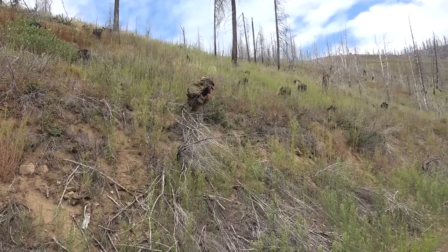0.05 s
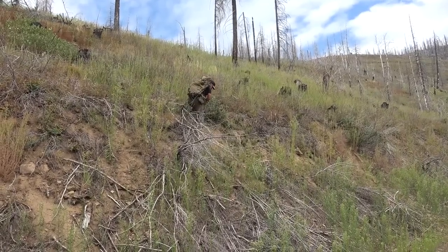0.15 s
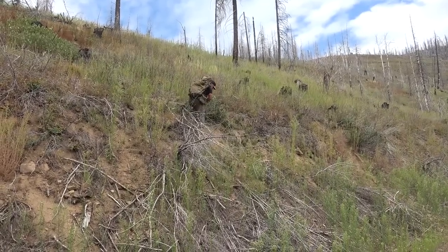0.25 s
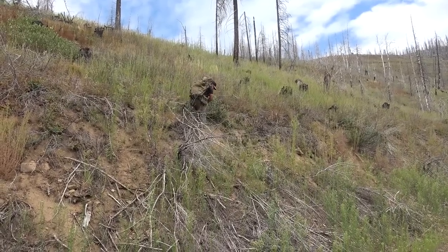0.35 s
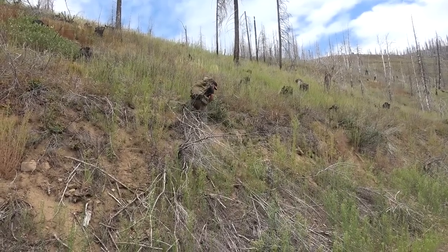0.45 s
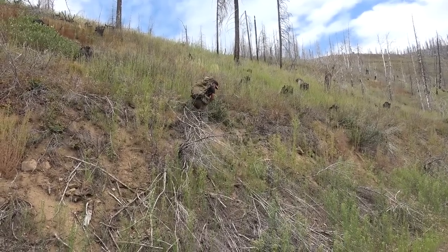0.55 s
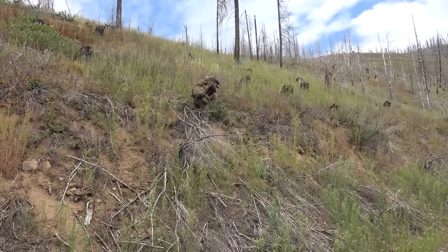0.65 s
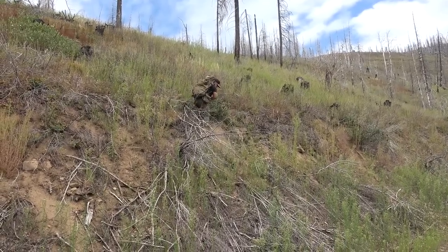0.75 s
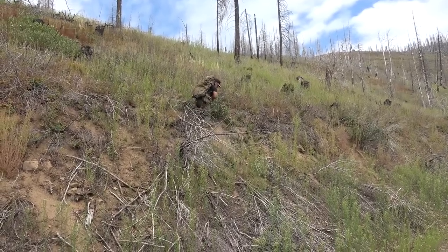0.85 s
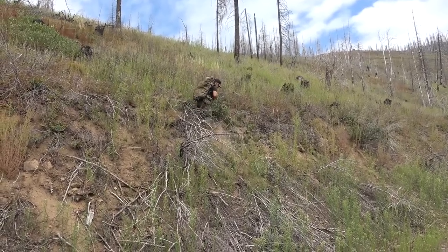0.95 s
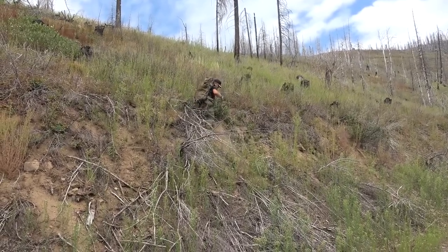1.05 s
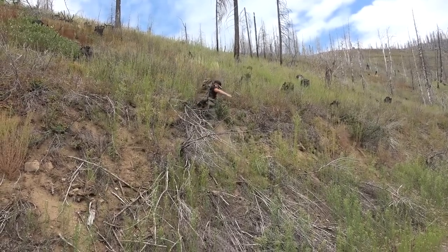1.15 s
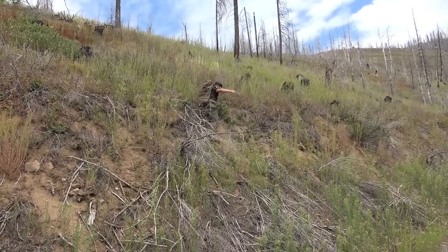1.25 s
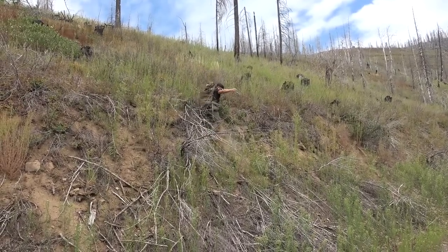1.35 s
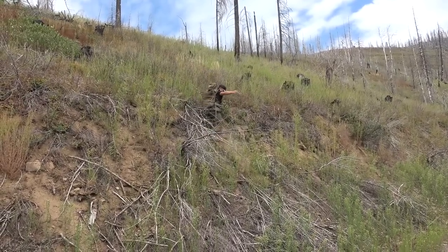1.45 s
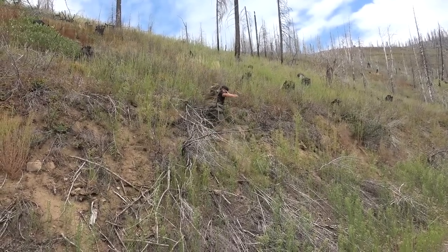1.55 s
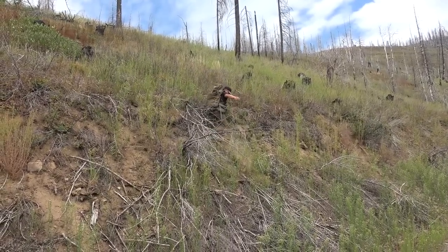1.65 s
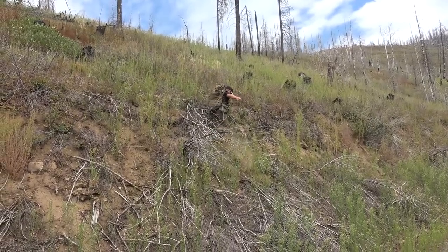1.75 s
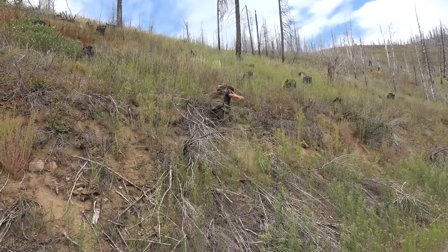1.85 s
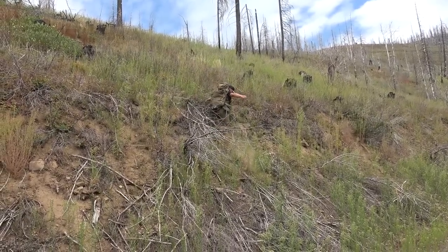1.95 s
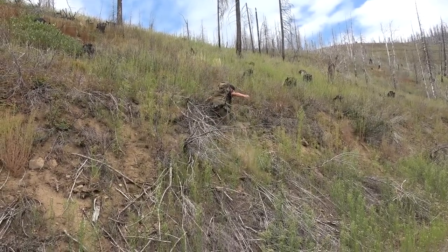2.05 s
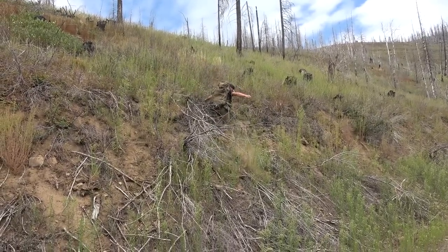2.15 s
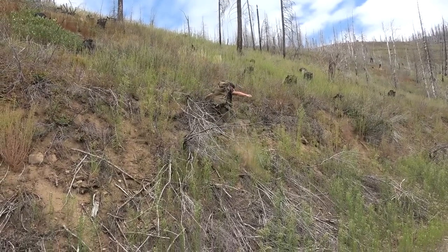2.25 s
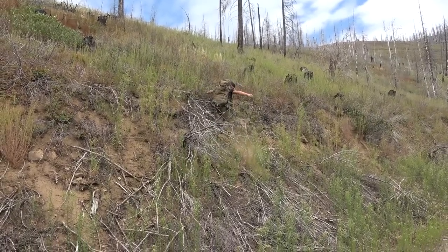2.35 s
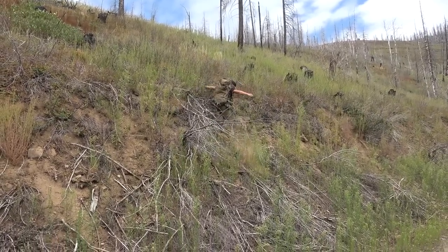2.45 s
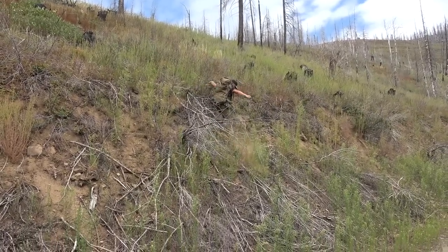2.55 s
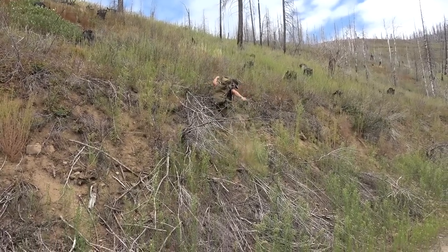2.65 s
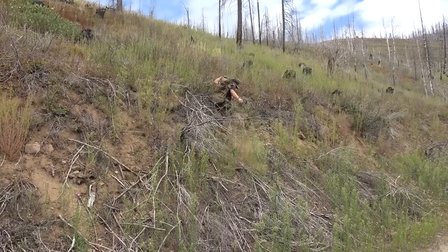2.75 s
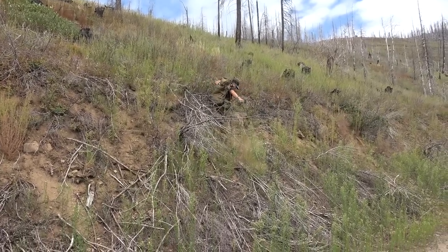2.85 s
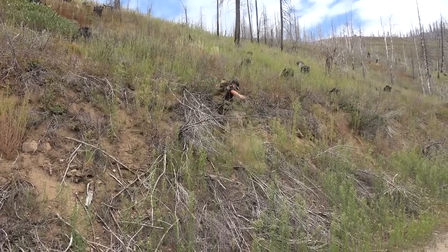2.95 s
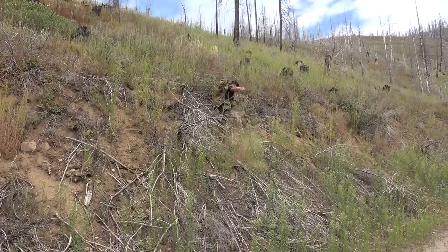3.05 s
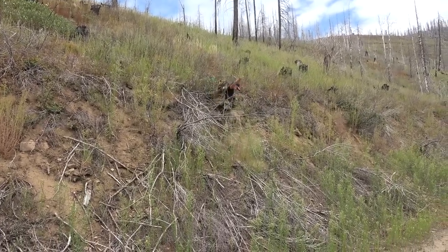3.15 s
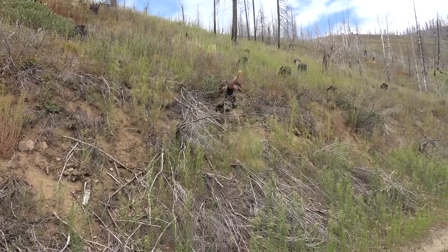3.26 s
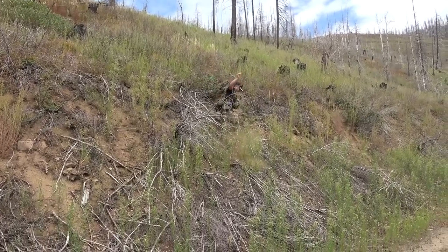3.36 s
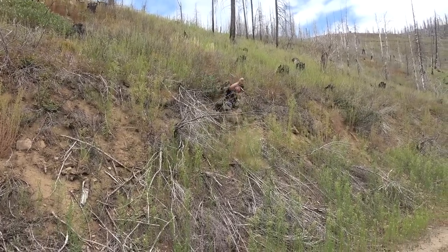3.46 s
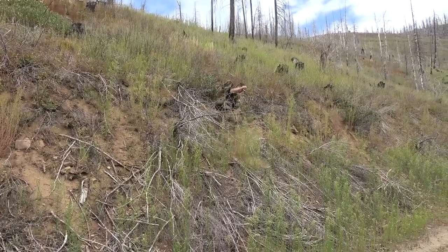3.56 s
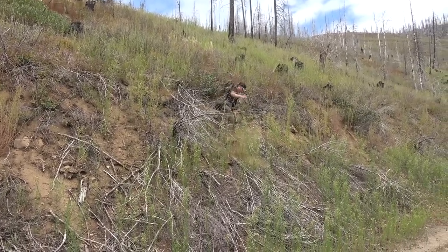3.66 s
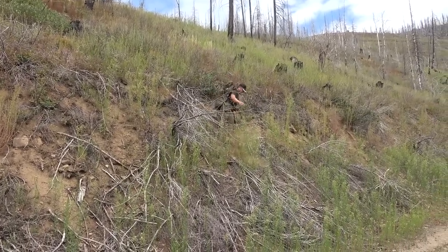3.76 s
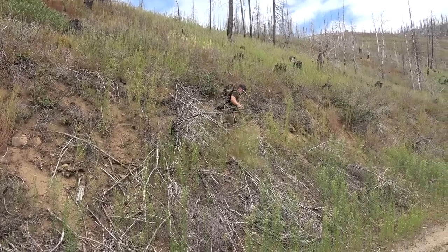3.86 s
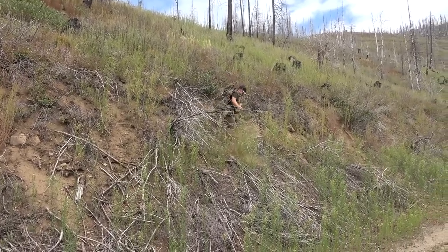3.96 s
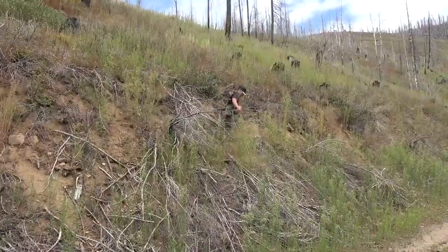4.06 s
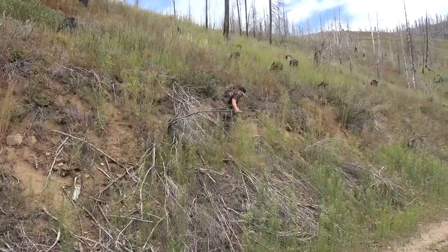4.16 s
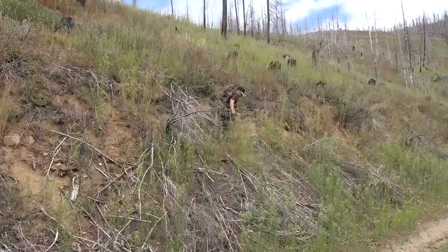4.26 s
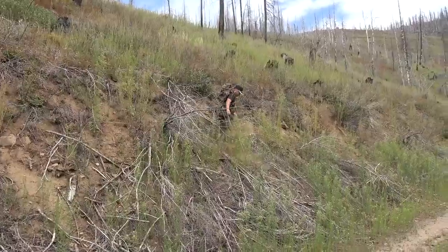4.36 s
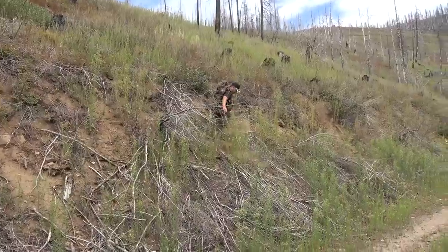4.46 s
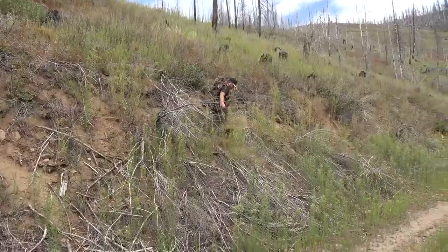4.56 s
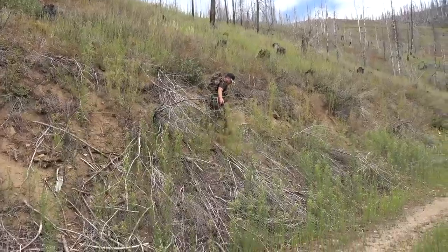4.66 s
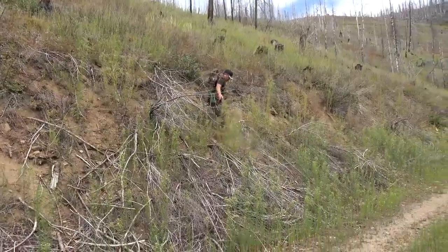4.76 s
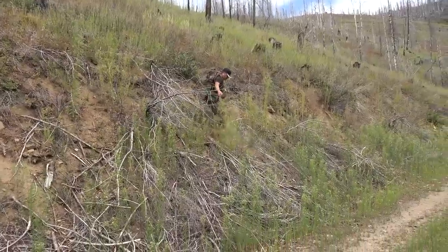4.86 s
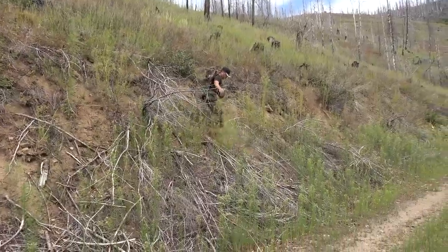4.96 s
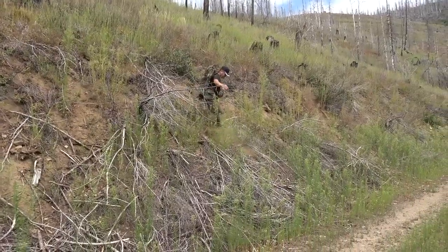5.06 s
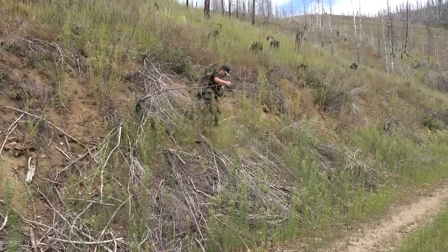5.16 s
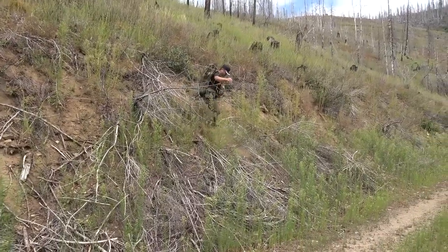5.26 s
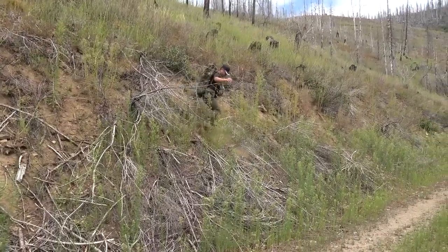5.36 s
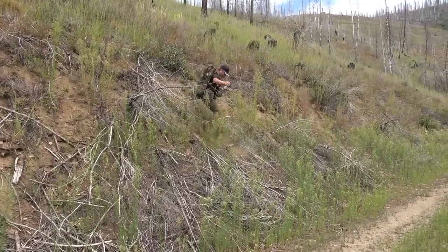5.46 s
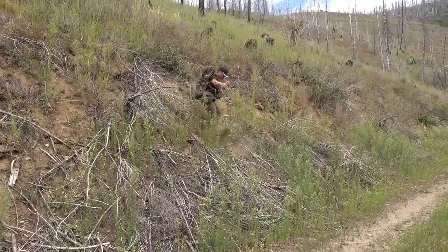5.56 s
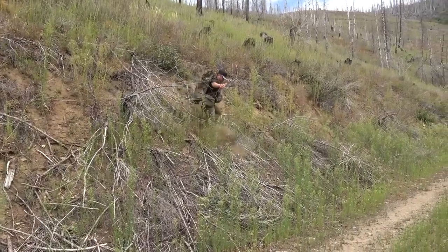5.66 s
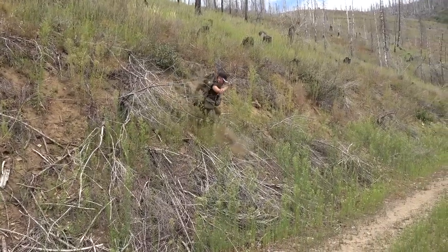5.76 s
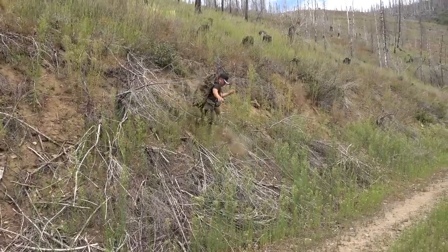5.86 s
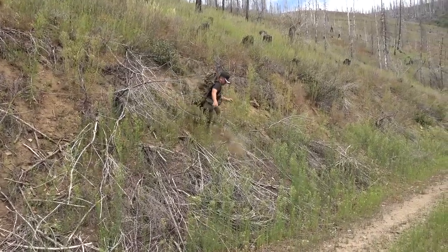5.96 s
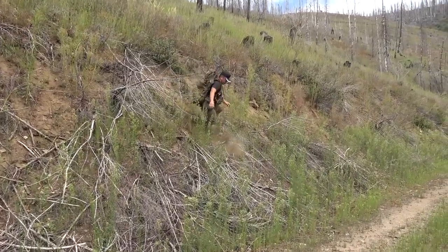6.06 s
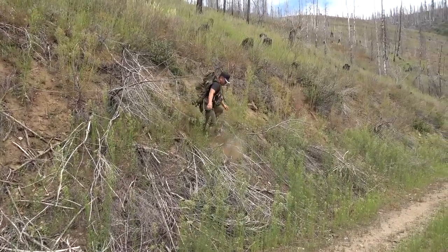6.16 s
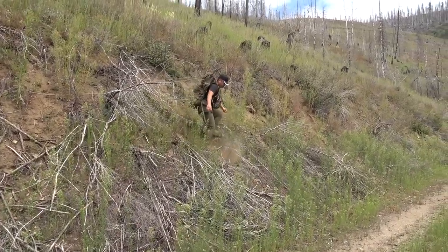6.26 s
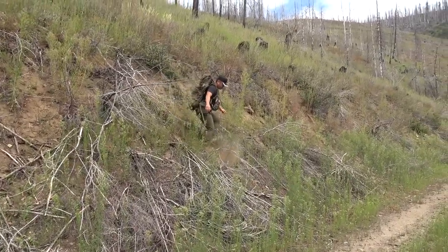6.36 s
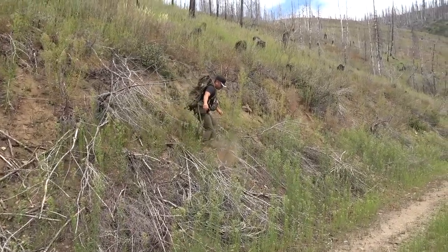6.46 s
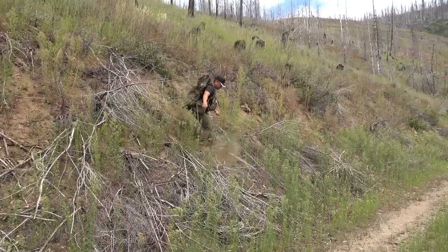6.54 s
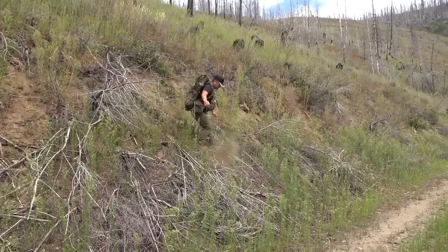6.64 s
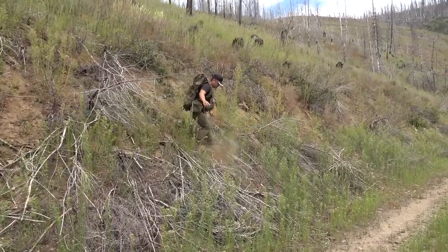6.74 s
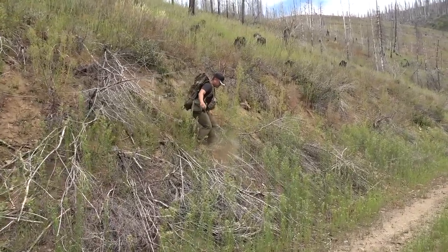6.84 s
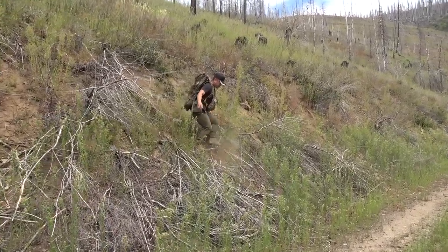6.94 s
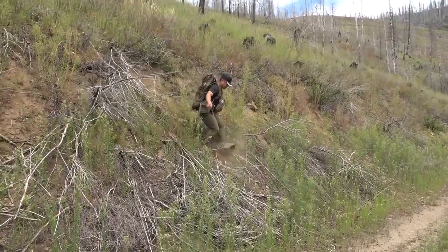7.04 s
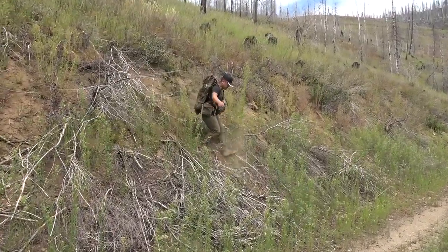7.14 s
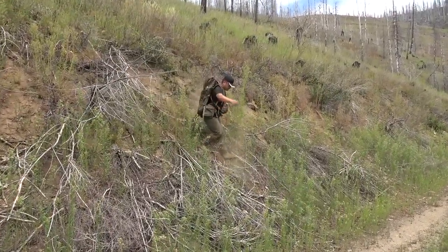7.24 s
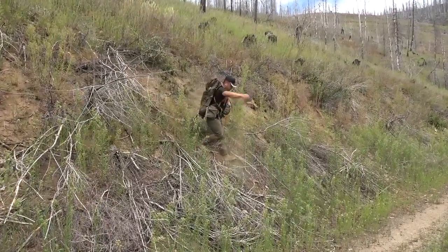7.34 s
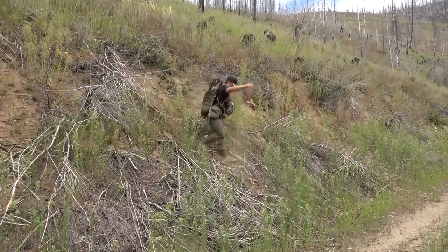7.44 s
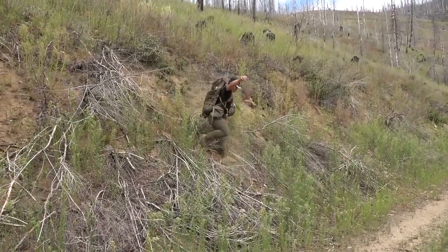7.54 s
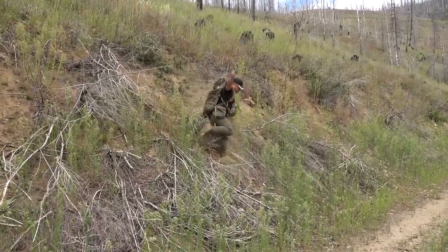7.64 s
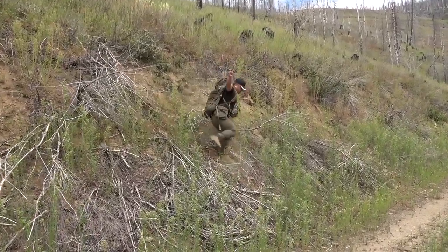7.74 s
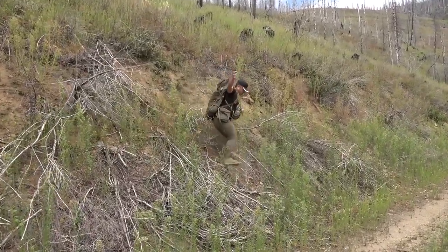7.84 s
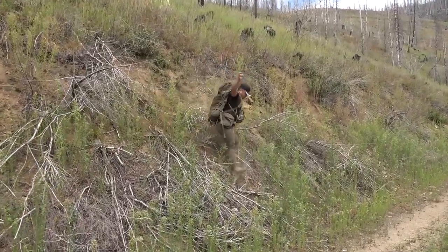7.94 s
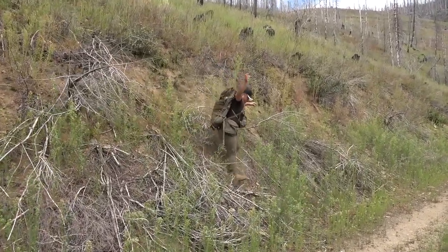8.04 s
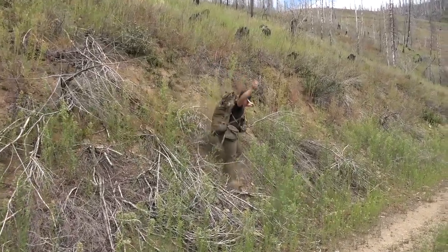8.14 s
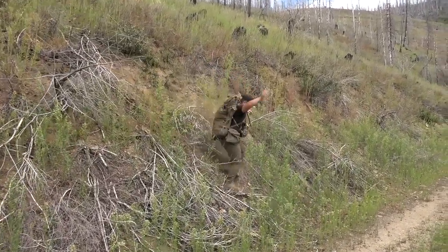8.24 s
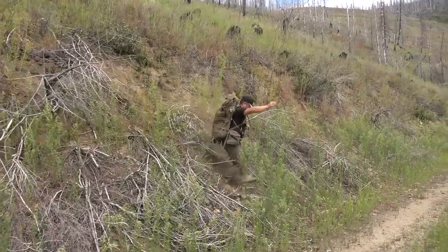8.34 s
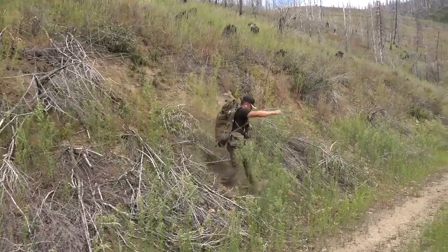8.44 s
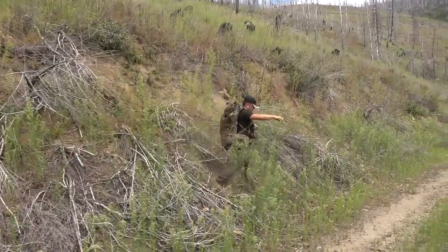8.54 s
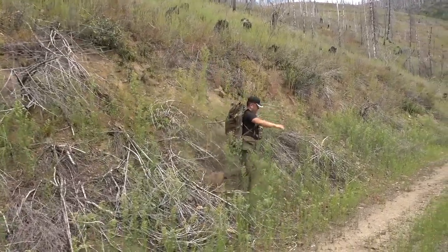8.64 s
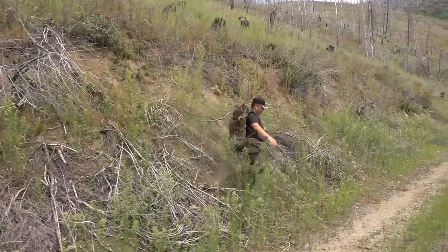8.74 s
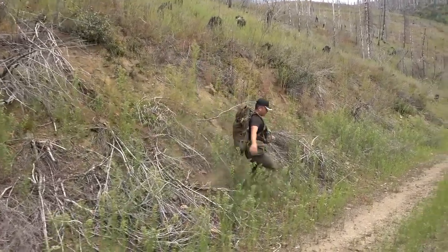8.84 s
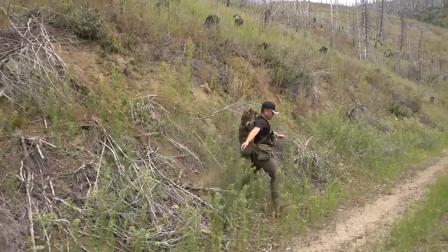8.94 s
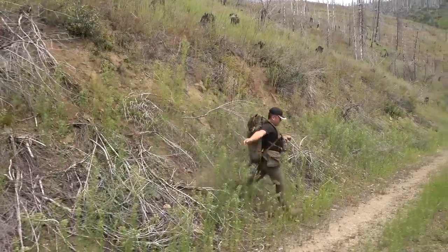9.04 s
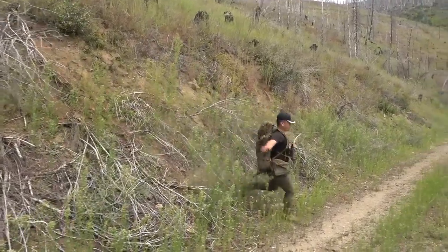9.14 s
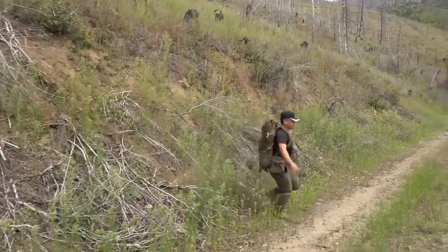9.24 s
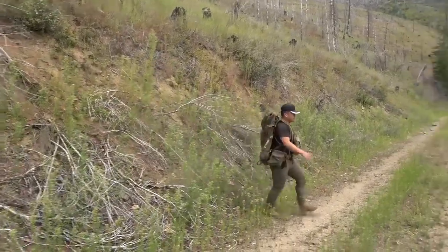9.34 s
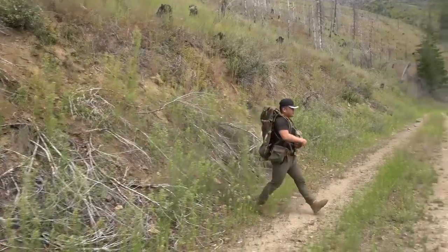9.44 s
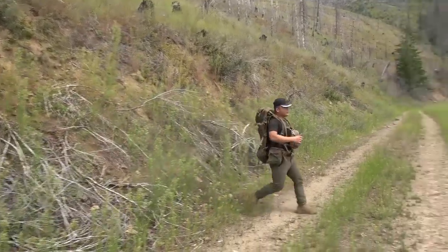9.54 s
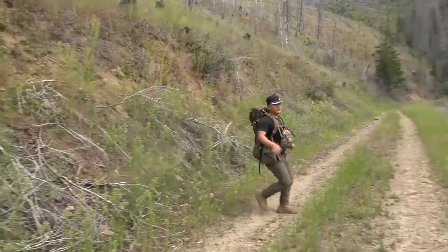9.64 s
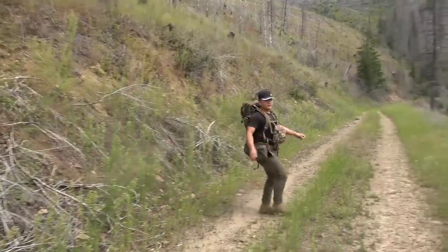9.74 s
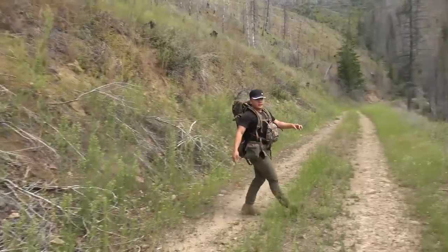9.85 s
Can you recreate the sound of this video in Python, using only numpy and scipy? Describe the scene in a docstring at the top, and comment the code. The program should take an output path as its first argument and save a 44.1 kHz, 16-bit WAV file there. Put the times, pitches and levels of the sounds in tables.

```python
"""Hiker coming down a dry slope

Steep hillside of dry grass and dead branches, microphone by a dirt track: the hiker is 18 m off at the start,
2 m at 6.5 s and nearly 8 m at the end. Stalks crackle against the legs (showers of filtered noise grains),
twigs snap (band-passed cracks and splinters), loose soil slides (grains over dull treads), and boots land on
earth and grit (decaying modes and noise). A faint low tone wavers briefly; a breeze hisses and rocks the microphone."""
import sys
import numpy as np
from scipy import signal
from scipy.fft import rfft, irfft, next_fast_len
from scipy.io import wavfile
from scipy.ndimage import uniform_filter1d

SR = 44100
rng = np.random.default_rng(int(sys.argv[2]) if len(sys.argv) > 2 else 0)


def unload_audio(sound):
    """Save the sound as a 16-bit wav file, at the path given as the first command line argument."""
    columns = np.transpose(np.atleast_2d(sound))
    # keep every value between -1 and 1, then stretch to whole-number steps
    steps = np.round(np.clip(columns, -1, 1) * 32767)
    wavfile.write(sys.argv[1], SR, steps.astype(np.int16))


N = 436590
TIME = np.arange(N) / SR


def from_db(db):
    """Amplitude ratio of a level in dB."""
    return 10 ** (np.asarray(db) / 20)


def rms_one(x):
    """Scale a signal to rms 1."""
    return x / np.sqrt(np.mean(x ** 2) + 1e-20)


def in_time(rows):
    """Each column of a curve at every sample."""
    s, *columns = np.transpose(rows)
    return [np.interp(TIME, s, c) for c in columns]


def at_hz(points, hz):
    """A spectrum read on a log-frequency axis."""
    freq, db = np.transpose(points)
    return np.interp(np.log(hz + 1e-3), np.log(freq), db)


def butter(x, hz, kind, order=2):
    """Causal Butterworth filter."""
    sos = signal.butter(order, np.clip(hz, 5, .48 * SR), kind, fs=SR, output="sos")
    return signal.sosfilt(sos, x + 1e-18)


def add(out, s, sound):
    """Mix a short sound in at a time."""
    at = int(np.clip(round(s * SR), 0, N - 1))
    out[at:at + len(sound)] += sound[:N - at]


def drift(rate):
    """Slow chance with rms 1, a new value 'rate' times a second."""
    knots = rng.standard_normal(int(TIME[-1] * rate) + 2)
    return rms_one(np.interp(TIME * rate, np.arange(len(knots)), knots))


def uneven(spread_db, per_s):
    """Stalks catch and let go, soil sticks and slips: a chance swing in dB."""
    return spread_db * drift(per_s)


def die_away(power, t60):
    """Each burst of power falls by 60 dB in t60."""
    keep_per_sample = from_db(-60 / (t60 * SR)) ** 2
    return signal.lfilter([1], [1, -keep_per_sample], power + 1e-18)


def noise(spectrum):
    """Smooth noise of a given colour, falling away beyond its ends; rms 1."""
    size = next_fast_len(N)
    hz = np.arange(size // 2 + 1) * SR / size
    low_end, high_end = spectrum[0][0] / 2, spectrum[-1][0] * 2
    ends = 1 / (1 + (hz / high_end) ** 4) / (1 + (low_end / (hz + 1e-3)) ** 4)
    colour = from_db(at_hz(spectrum, hz)) * ends
    return rms_one(irfft(rfft(rng.standard_normal(size)) * colour, size)[:N])


def grains(spectrum, per_s, spread_db, t60, own_db, count=8, linger=4.6, linger_db=-7.0):
    """Random tiny fractures, each with its own size and colour, dying fast and then lingering; rms 1."""
    chance, size = rng.random(N), np.minimum(rng.exponential(1, N), 3.5)
    at = np.flatnonzero(chance < per_s / SR)
    edges = np.geomspace(spectrum[0][0], spectrum[-1][0], count + 1)
    white, out = rng.standard_normal((2, N)), 0
    for k, (low, high) in enumerate(zip(edges, edges[1:])):
        # a chance gain in each band gives every grain its own colour
        own = own_db * np.clip(rng.standard_normal(N)[at], -2, 2)
        power = np.zeros(N)
        power[at] = from_db(spread_db * size[at] + own) ** 2
        power = die_away(power, t60) + from_db(linger_db) ** 2 * die_away(power, t60 * linger)
        envelope = rms_one(np.sqrt(power))
        band = butter(white[k % 2] * envelope, [low, high], "band")
        out = out + from_db(at_hz(spectrum, np.sqrt(low * high))) * band
    return rms_one(out)


SETTLE_S, SETTLE_DB = .16, -15   # what was disturbed goes on settling, quietly


def swells(rows, attack_s, release_s, rest_db, settles=True):
    """Each event builds up, holds, stops and may settle, above a resting level; one dB curve per level column."""
    t, rows = TIME[::40], np.array(rows)
    start, length = rows[:, :1], rows[:, 1:2]
    rise = np.exp(np.minimum(t - start, 0) / attack_s)
    after = np.maximum(t - start - length, 0)
    settling = settles * from_db(SETTLE_DB) * np.exp(-after / SETTLE_S)
    fall = np.maximum(np.exp(-after / release_s), settling)
    power = from_db(rows[:, 2:].T) ** 2 @ (rise * fall) ** 2
    return [np.interp(TIME, t, 10 * np.log10(p + from_db(db) ** 2)) for p, db in zip(power, rest_db)]


# gusts meeting the microphone, before the buffet trim: t/s, length/s, level/dB
GUSTS = [(1.45, 0.27, -33), (1.85, 0.39, -37), (3.35, 0.29, -38), (5.3, 0.16, -35), (6.06, 0.16, -35),
         (6.5, 0.11, -34.5), (6.86, 0.43, -37), (7.905, .06, -23.5), (9.7, 0.085, -25.5)]
GUST_ATTACK_S, GUST_RELEASE_S, LULL_DB = .03, 0.038, -42
# colour of the pressure swings at the microphone: f/Hz, relative level/dB per Hz
BUFFET = [(10, 3.5), (15, 4), (25, -4.5), (40, -16), (70, -24), (150, -41)]
# colour of the breeze over the hillside: f/Hz, relative level/dB per Hz
BREEZE = [(40, -8), (90, -2.5), (170, -18), (280, -0.5), (500, -2.5), (1000, -4.5), (2000, -8.5),
          (5000, -9), (10000, -42), (16000, -33)]
BREEZE_DB = -54.5


def wind(buffet_db=-2.5):
    """A far, even hiss and slow pressure swings on the microphone."""
    gust_db, = swells(GUSTS, GUST_ATTACK_S, GUST_RELEASE_S, [LULL_DB], settles=False)
    swing = noise(BUFFET)
    # even out the swings over 0.2 s so that the gusts alone set their level
    swing = swing / np.sqrt(uniform_filter1d(swing ** 2, size=SR // 5) + 1e-6)
    hiss = from_db(BREEZE_DB) * noise(BREEZE)
    return hiss + from_db(gust_db + buffet_db) * swing


# legs sweeping through the brush, before the layer trims:
# t/s, length/s, dry grass level/dB, woody stems level/dB
SWEEPS = [(0.23, 0.19, -47.5, -52), (0.53, .05, -46.5, -60), (0.74, .03, -39, -52.5), (0.85, .2, -44, -50),
          (1.15, .17, -42.5, -49), (1.45, .23, -40.5, -49), (1.75, 0.29, -44, -46),
          (2.06, 0.038, -36.5, -53.5), (2.17, .16, -42.5, -50.5), (2.42, .04, -39.5, -53),
          (2.56, .12, -40.5, -51), (2.73, .33, -47.5, -54), (3.16, .17, -41.5, -48.5),
          (3.38, .64, -48.5, -56.5), (4.12, .3, -52.5, -58.5), (4.765, .175, -30.5, -44),
          (4.97, 0.067, -33, -56), (5.09, 0.07, -44, -56), (5.65, 0.14, -47, -49), (5.8, 0.17, -33, -37.5),
          (6.04, 0.042, -34, -37), (6.17, 0.11, -38.5, -42.5), (6.28, 0.3, -33, -44), (6.58, .04, -26, -38),
          (6.67, 0.078, -29.5, -35), (6.81, 0.028, -59.5, -40), (6.96, 0.14, -42, -47),
          (7.185, .025, -36, -35.5), (7.25, 0.046, -30, -39.5), (7.36, 0.069, -33, -39.5),
          (7.48, 0.27, -34.5, -44), (7.78, 0.24, -33, -38.5), (7.99, .07, -33, -39.5),
          (8.09, .07, -27.5, -32), (8.19, .12, -32, -39), (8.35, .2, -33, -39.5), (8.64, .16, -33.5, -37.5),
          (8.87, .26, -46, -44), (8.97, .06, -44, -43), (9.2, 0.065, -39, -41), (9.32, 0.081, -36.5, -39.5),
          (9.65, 0.018, -48.5, -34.5), (9.87, 0.023, -44.5, -48)]
SWEEP_ATTACK_S, SWEEP_RELEASE_S = 0.03, 0.044
STIR_GRASS_DB, STIR_STEMS_DB = -50, -54   # stalks stirring between strides


def rustle():
    """Level of the grass and of the stems, in dB, as the legs pass."""
    return swells(SWEEPS, SWEEP_ATTACK_S, SWEEP_RELEASE_S, [STIR_GRASS_DB, STIR_STEMS_DB])


# colour of dry grass: f/Hz, relative level/dB per Hz
GRASS = [(1000, -7), (2000, -12), (3300, -5), (5000, 0), (8000, 4), (12000, 0), (16000, -7)]
# colour of woody stems: f/Hz, relative level/dB per Hz
STEMS = [(600, -18), (1200, -11), (2000, -3), (3000, 0), (4500, -1.5), (8000, -7)]
# hiker to microphone, for the brush here and the soil below: t/s, distance/m
DISTANCE = [(0, 18.2), (4, 11.5), (6.5, 1.95), (8.5, 3.6), (9.9, 7.7)]


def brush(crackle_db=-1.0, swish_db=-4.0, stems_db=-1.0, dull_db_per_m=0.52, push_db=-2.0,
          blend_db_per_m=0.1939):
    """Harder pushing breaks more stalks; countless blades merge into a swish. Distance blurs and dulls the grass."""
    grass_db, stem_db = rustle() + uneven(spread_db=1.0, per_s=44)
    metres, = in_time(DISTANCE)
    farther = metres - 14   # beyond the distance at which crackle and swish are untilted
    push = np.clip((grass_db + 56.0) / 20, 0, 1)
    per_s = 260 * from_db(2.6 * push)
    crackle = grains(GRASS, per_s, spread_db=5.0, t60=0.0066, own_db=1.0, linger=10.5, linger_db=-11.0)
    crackle = from_db(crackle_db + push_db * push) * crackle
    swish = from_db(swish_db) * noise(GRASS)
    blend_db = blend_db_per_m * farther
    grass = from_db(grass_db) * (crackle * from_db(-blend_db) + swish * from_db(blend_db))
    stems = grains(STEMS, 420, spread_db=3.5, t60=0.0084, own_db=4.5, count=7)
    stems = from_db(stem_db + stems_db) * stems
    # the grass loses its top with distance
    low = butter(grass, 12600, "low", order=1)
    treble = (grass - low) * from_db(-3.0 - dull_db_per_m * farther)
    return low + treble + stems


# a foot takes the weight and the slope gives way, before the layer trims:
# t/s, length/s, sliding soil level/dB, tread level/dB
SLIDES = [(0.24, 0.06, -47.5, -53), (0.38, 0.024, -45.5, -51), (0.53, 0.034, -49, -61),
          (0.81, 0.19, -42, -51.5), (1.11, 0.25, -42.5, -52), (1.42, 0.21, -43, -53),
          (1.76, 0.024, -42, -49), (1.9, 0.54, -47, -58.5), (2.79, 0.039, -45, -47.5),
          (2.92, 0.092, -44, -55), (3.1, 0.41, -50, -54), (3.72, 0.59, -52, -63.5),
          (4.77, 0.051, -43.5, -47.5), (5.02, 0.034, -48.5, -53.5), (5.13, 0.044, -49, -51.5),
          (5.68, 0.13, -45, -54), (5.82, 0.12, -37.5, -45.5), (6.07, 0.039, -46.5, -52),
          (6.26, 0.11, -44.5, -55.5), (6.48, 0.061, -36.5, -39.5), (6.59, 0.21, -39.5, -47),
          (6.94, 0.09, -43.5, -50), (7.18, 0.054, -42.5, -47.5), (7.285, 0.069, -39.5, -38.5),
          (7.37, .11, -36, -41.5), (7.53, 0.12, -38.5, -53), (7.77, 0.08, -34.5, -46),
          (7.95, 0.17, -37, -46.5), (8.13, .06, -32, -33.5), (8.23, 0.066, -36.5, -59),
          (8.4, 0.2, -39, -42), (8.63, 0.044, -31, -35.5), (8.71, 0.046, -30, -52),
          (8.97, 0.084, -37, -55.5), (9.21, 0.036, -30, -33), (9.28, 0.028, -27, -39),
          (9.37, 0.037, -34, -43.5), (9.48, .05, -44, -41), (9.635, 0.043, -33, -34),
          (9.75, 0.19, -40, -62)]
SLIDE_ATTACK_S, SLIDE_RELEASE_S = 0.038, 0.065
TRICKLE_SOIL_DB, TRICKLE_TREAD_DB = -51.5, -55.5   # loose soil still trickling between steps
# colour of clods and pebbles: f/Hz, relative level/dB per Hz
SOIL = [(170, -19), (260, -8.5), (350, 2), (500, 1), (650, 2), (900, -1), (1250, -1.5), (2000, -6.5),
        (4000, -12)]
# colour of sliding soil heard from far up the slope: f/Hz, relative level/dB per Hz
WASH = [(180, -23), (260, 7), (330, 2.5), (450, -5), (620, -3.5), (900, -7), (1300, -6.5), (2200, -13),
        (4000, -20)]
# colour of the dull push of a tread: f/Hz, relative level/dB per Hz
TREAD = [(45, -25), (80, 8.5), (130, -6.5), (210, 4), (400, -19)]


def ground(soil_db=-5.0, tread_db=-6.5, blur_m=24.8):
    """Clods and pebbles tumble from the boots, over the dull push of each tread; far off they blur into a wash."""
    rest_db = [TRICKLE_SOIL_DB, TRICKLE_TREAD_DB]
    levels = swells(SLIDES, SLIDE_ATTACK_S, SLIDE_RELEASE_S, rest_db)
    slide_db, weight_db = levels + uneven(spread_db=1.0, per_s=34)
    metres, = in_time(DISTANCE)
    blur = np.clip(metres / blur_m, 0, 1) ** 2
    clods = grains(SOIL, 450, spread_db=2.5, t60=0.011, own_db=6.5, count=11, linger_db=-10.5)
    soil = np.sqrt(1 - blur) * clods + np.sqrt(blur) * noise(WASH)
    tread = grains(TREAD, 200, spread_db=-0.2, t60=0.042, own_db=4.0, count=4, linger_db=-23.0)
    return from_db(slide_db + soil_db) * soil + from_db(weight_db + tread_db) * tread


def small_twigs(count=80, above_db=9.5, spread_db=1.5, follows=.3, centre_hz=7800, spread_octaves=0.26,
                width=1.0, t60=0.008):
    """Lesser twigs give way at random, more often and louder where the rustle is strong: rows as in TWIGS."""
    grass_db, _ = rustle()
    due = np.cumsum(from_db(follows * grass_db))
    shares = (np.arange(count) + rng.random(count)) / count
    at = np.searchsorted(due / due[-1], shares)
    chance = np.clip(rng.standard_normal((count, 2)), -2, 2)
    rows = []
    for i, (size, pitch) in zip(at, chance):
        db = grass_db[i] + above_db + spread_db * size
        hz = centre_hz * 2 ** (spread_octaves * min(pitch, 1))
        rows.append((i / SR, db, hz, width, t60))
    return rows


# the loudest twigs and branches breaking (width is held to 0.4-3.2 octaves, t60 to at least 2 ms):
# t/s, level/dB, centre f/Hz, width/octaves, t60/s
TWIGS = [(0.1, -25, 6170, 1.1, .036), (0.1672, -25.5, 6640, 0.34, .004), (0.2373, -27, 5600, 3, 0.0027),
         (0.2497, -23.5, 8400, 2, 0.0035), (0.3019, -30, 6660, 2, .004), (0.536, -28, 8000, 1.2, 0.009),
         (1.057, -28.5, 10100, 0.65, 0.011), (1.1125, -27, 7000, 2.1, 0.013),
         (1.193, -27.5, 5900, 0.92, 0.042), (1.8044, -22, 7700, .7, .024), (1.951, -28.5, 5600, .4, 0.0088),
         (2.002, -21.5, 6300, 4.5, 0.015), (2.069, -24, 5540, 1, 0.014), (2.099, -23, 4640, 1.3, 0.012),
         (1.63, -35, 1300, 0.83, .015), (2.177, -30.5, 1790, 4.2, 0.013), (2.212, -32, 1490, 2.6, 0.015),
         (2.559, -24.5, 4550, 1.9, 0.087), (2.764, -31, 2980, 2.2, 0.0068), (3.391, -36.5, 2200, 2.5, .013),
         (3.442, -38, 860, 0.85, 0.024), (3.561, -29.5, 7260, 0.7, 0.0036), (4.486, -30.5, 6950, .8, .011),
         (4.763, -21, 5600, 2.8, 0.024), (4.8903, -13.5, 7860, 0.76, 0.019), (4.919, -14, 7900, 1.2, 0.021),
         (5.02, -15, 6000, 2.1, 0.047), (5.045, -13.5, 8260, 0.32, 0.0089), (5.2899, -24, 7060, 1, 0.014),
         (5.324, -31, 7000, 0.9, .004), (5.3398, -31.5, 6900, 1, 0.011), (5.5973, -26.5, 8700, .4, 0.046),
         (5.6949, -22.5, 5640, 1.7, .02), (5.795, -17.5, 7200, 2.9, 0.026),
         (5.9253, -18.5, 5060, 1.6, 0.045), (5.945, -3, 5230, 0.99, 0.0052),
         (5.9535, -15.5, 9100, 1, 0.0031), (6.0437, -15.5, 5700, 0.5, 0.0094),
         (6.0753, -18, 1530, 0.62, 0.0054), (6.109, -16.5, 5560, 5.4, 0.0031),
         (6.266, -15, 8600, 3.1, .035), (6.3072, -6.5, 9400, 1.26, 0.017), (6.3587, -13, 8900, 1.4, .07),
         (6.481, -7.5, 9400, 0.35, .003), (6.497, -16, 9640, .8, 0.042), (6.5377, -20.5, 8660, 1.6, .008),
         (6.557, -11, 7700, 3.7, 0.023), (6.5807, -7, 8000, 2.8, 0.034), (6.608, -6, 8700, 2.5, 0.013),
         (6.6175, -13, 9100, 1.04, 0.0063), (6.6318, -8.5, 7200, 1.4, 0.011),
         (6.7032, -5, 6900, 2.1, 0.016), (6.772, -15.5, 6600, 0.72, .008),
         (6.8216, -27.5, 2200, 0.71, 0.0072), (7.037, -23, 3970, 4.5, .004),
         (7.2618, -11, 8800, 1.06, 0.0043), (7.2856, -9.5, 8340, 1.4, 0.016),
         (7.2931, -8, 9200, .6, 0.0066), (7.3476, -12, 6360, 1.1, 0.026),
         (7.3745, -10.5, 7100, 3.5, 0.0073), (7.3803, -14.5, 6460, 2.3, .006),
         (7.3967, -14, 6650, 3.5, 0.0042), (7.419, -5, 6460, 3.1, 0.0073), (7.4315, -18, 3270, 1.1, 0.0042),
         (7.459, -20.5, 5000, 3.5, .03), (7.5457, -18, 7500, 1.3, .004), (7.682, -12.5, 6820, 0.46, 0.0086),
         (7.864, -19, 4900, 3.2, .015), (7.9894, .5, 8100, 0.35, 0.007),
         (8.0896, -11.5, 8170, 0.74, 0.0069), (8.096, -6.5, 8600, .8, 0.0095),
         (8.1171, -1.5, 6950, 0.19, 0.0093), (8.2765, -6.5, 7500, 1.8, 0.036),
         (8.396, -9.5, 7870, 0.6, 0.0099), (8.4861, -13, 5480, 2.3, .011), (8.574, -25.5, 1900, 1, .011),
         (8.6157, -14.5, 7940, 1.7, 0.018), (8.7156, -17, 5740, 5.1, 0.0037),
         (9.239, -23, 2960, 2.2, 0.046), (9.328, -14, 10300, 1.4, 0.0088), (9.552, -28.5, 2130, 1.2, 0.04),
         (9.8187, -24.5, 5000, .8, 0.0087), (9.886, -24.5, 3240, 0.6, 0.0089)]


def twigs(level_db=0.0, splinter_db=-12.5, splinter_t60=0.015, rise_s=.0001, body_db=-22.5, edge=0.6):
    """A break is a sharp crack in the twig's own band, then fibres splinter."""
    out, t = np.zeros(N), np.arange(SR // 12) / SR
    for s, db, hz, octaves, t60 in TWIGS + small_twigs():
        white, fibres = rng.standard_normal((2, len(t)))
        crack = white * from_db(-60 * t / max(t60, .002)) * (1 - np.exp(-t / rise_s))
        crack[SR // 5000] += edge * np.linalg.norm(crack)   # the instant at which the wood gives way
        splinters = fibres * np.abs(fibres) ** .5 * from_db(splinter_db - 60 * t / splinter_t60)
        burst = crack + splinters
        half = 2 ** (np.clip(octaves, .4, 3.2) / 2)
        snap = butter(burst, [hz / half, hz * half], "band", order=1)
        snap = butter(snap, hz / 4, "high")
        snap = butter(snap, hz * 2.02, "low", order=4)
        snap = snap + from_db(body_db) * butter(burst, [300, 2500], "band")
        # the level is that of the first 3 ms of energy, packed into 1 ms
        strength = np.sqrt(np.sum(snap[:SR // 330] ** 2) * 1000 / SR)
        add(out, s, from_db(db + level_db) * snap / strength)
    return out


# boots and stones striking the ground:
# t/s, knock peak level/dB, contact hardness f/Hz, grit level/dB against the knock
BOOTS = [(0.405, -22, 1700, -18.5), (1.096, -37, 159, -28), (6.483, -35.5, 395, -21.5),
         (7.039, -25, 2000, -21), (7.151, -26.5, 1980, -27), (7.287, -25, 700, -32), (7.381, -21, 800, -26),
         (7.398, -25, 1500, -23), (7.65, -17.5, 700, -9), (7.761, -17, 1780, -7.5),
         (7.863, -20.5, 1490, -18.5), (8.136, -20, 700, -11), (8.615, -27, 500, -26),
         (9.171, -23, 393, -25), (9.2087, -10, 750, -16.5), (9.2784, -10.5, 1020, -15),
         (9.391, -19, 1080, -12), (9.57, -25, 494, -8.5), (9.577, -18.5, 450, -21),
         (9.6232, -15, 1600, -11.5), (9.629, -9.5, 1010, -24), (9.657, -5.5, 1500, -33),
         (9.673, -23, 1400, -2)]
# modes of packed earth under a boot: f/Hz, level/dB, t60/s before the ring factor
EARTH = [(131, -18, 0.025), (262, -7.5, 0.077), (577, -1, 0.042), (750, 13, 0.004), (1254, 21, 0.0027),
         (1750, 8, 0.0057)]


def boots(level_db=0.0, grit_t60=0.041, ring=1.6, settle=0.75):
    """The sole knocks on packed earth, which dies at once, and crushes grit; a soft contact is duller."""
    out, t = np.zeros(N), np.arange(SR // 8) / SR
    hz, mode_db, t60 = np.transpose(EARTH)[:, :, None]
    for s, db, hard_hz, grit_db in BOOTS:
        detune, strength = rng.standard_normal((2, len(EARTH), 1))
        gains = from_db(mode_db + 2 * strength - 60 * t / (ring * t60))
        knock = np.sum(gains * np.sin(2 * np.pi * hz * np.exp(0.082 * detune) * t), axis=0)
        # the sole settles in a few quick slips
        slip_now = rng.random(len(t)) < 900 / SR
        slips = settle * rng.standard_normal(len(t)) * slip_now * from_db(-60 * t / 0.026)
        knock = knock + signal.fftconvolve(knock, slips)[:len(t)]
        knock = butter(knock, hard_hz, "low")
        knock = knock / np.abs(knock).max()
        grit = rms_one(butter(rng.standard_normal(len(t)) ** 3, [400, 2400], "band", order=1))
        grit = grit * from_db(grit_db - 60 * t / grit_t60)
        add(out, s, from_db(db + level_db) * (knock + grit))
    return out


# a faint, low tone during the slide: t/s, f/Hz, rms level/dB
TONE = [(8.26, 354, -61), (8.30, 354, -55), (8.36, 369, -45.5), (8.40, 356, -61), (8.45, 363, -51),
        (8.52, 372, -42.5), (8.56, 393, -44.5), (8.59, 373, -63)]


def tone(waver=0.0183):
    """A nearly pure tone: one sine that wavers in pitch."""
    hz, db = in_time(TONE)
    phase = 2 * np.pi * np.cumsum(hz * (1 + waver * drift(65))) / SR
    sounding = (TIME > TONE[0][0]) & (TIME < TONE[-1][0])
    return np.sqrt(2) * np.sin(phase) * from_db(db) * sounding


def scene():
    """The hiker on the slope, and the breeze."""
    return (wind() + brush() + ground() + twigs() + boots() + tone())[None]


# colour of the microphone behind its grille: f/Hz, width/Hz, level/dB
GRILLE = [(3520, 1100, -2.5), (4460, 7200, -2.5), (6600, 1600, -4), (8140, 430, 2), (10610, 2900, -8.5),
          (11700, 12000, -0.5), (15400, 1900, -8)]
CUTOFF_HZ = 15900


def record(dry):
    """The grille colours the treble, the loudest peaks clip just below full scale, the top is cut."""
    for hz, width_hz, db in GRILLE:
        b, a = signal.iirpeak(hz, hz / width_hz, fs=SR)
        dry = dry + (from_db(db) - 1) * signal.lfilter(b, a, dry)
    clipped = np.clip(dry, -.93, .93)
    top_cut = signal.ellip(10, .2, 70, CUTOFF_HZ, fs=SR, output="sos")
    return signal.sosfilt(top_cut, clipped)


dry = scene()
out = record(dry)
unload_audio(out)
```